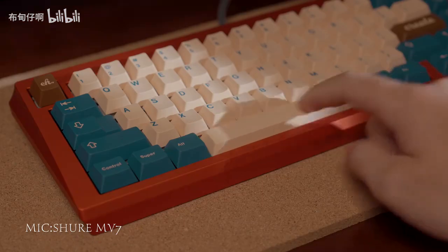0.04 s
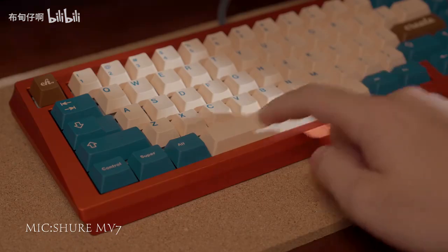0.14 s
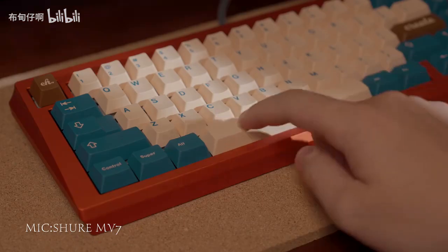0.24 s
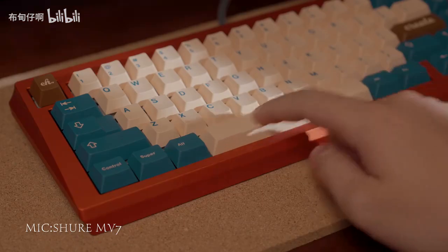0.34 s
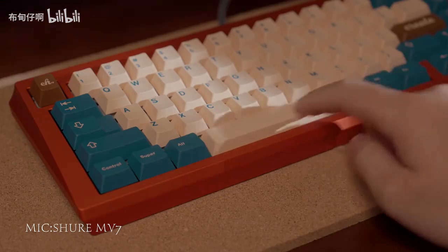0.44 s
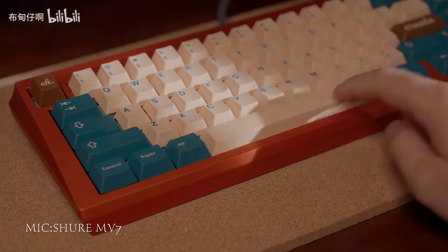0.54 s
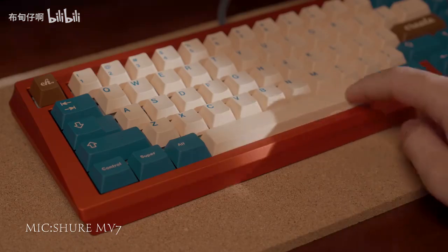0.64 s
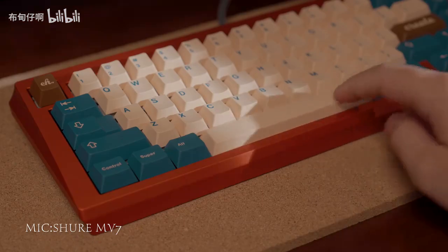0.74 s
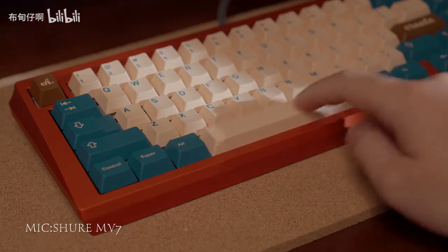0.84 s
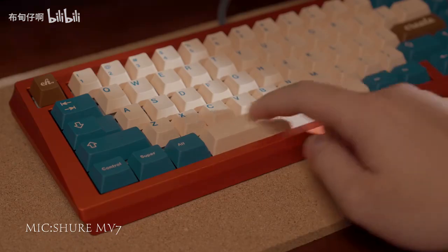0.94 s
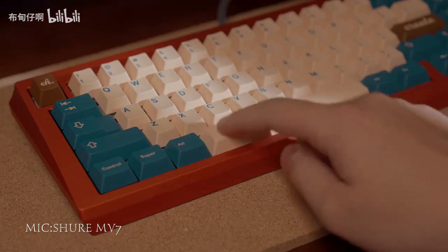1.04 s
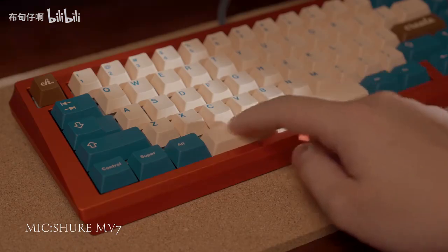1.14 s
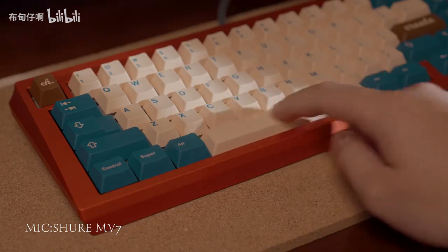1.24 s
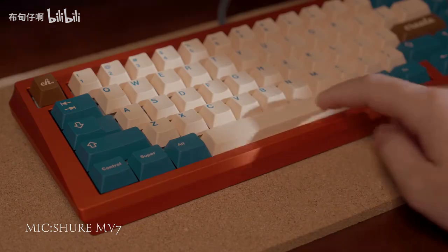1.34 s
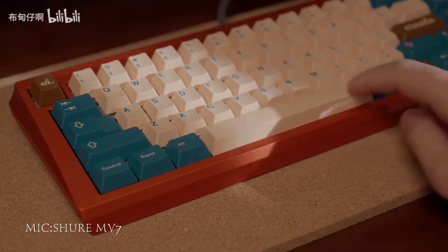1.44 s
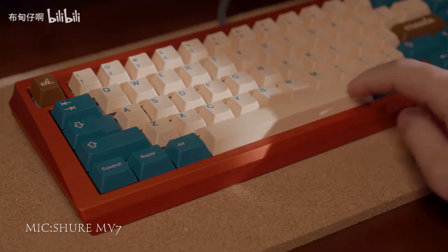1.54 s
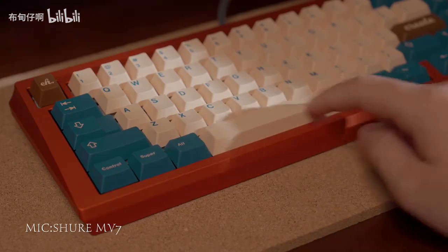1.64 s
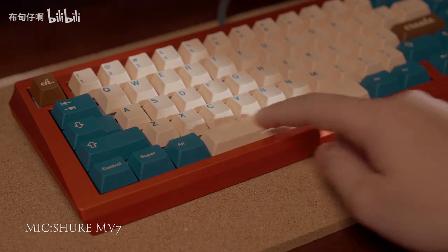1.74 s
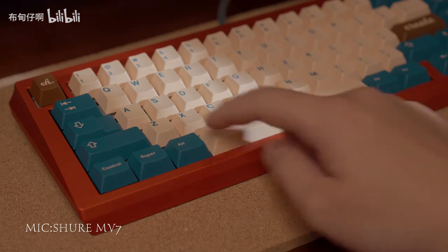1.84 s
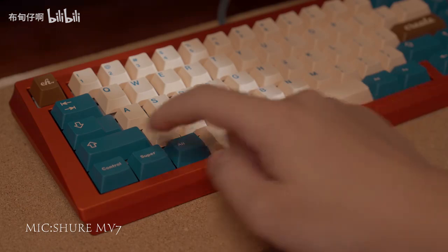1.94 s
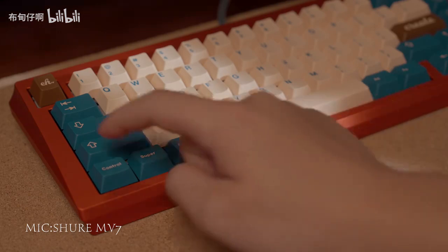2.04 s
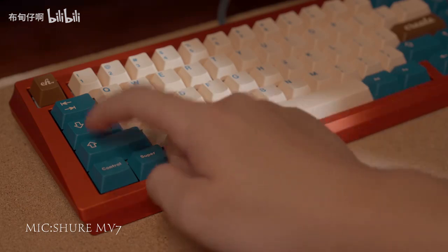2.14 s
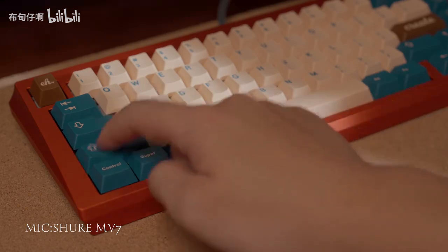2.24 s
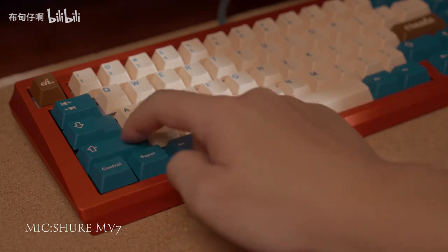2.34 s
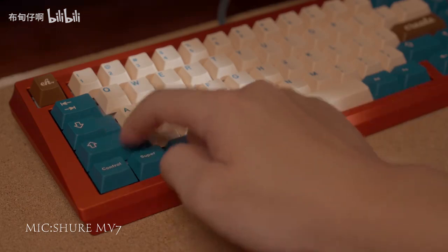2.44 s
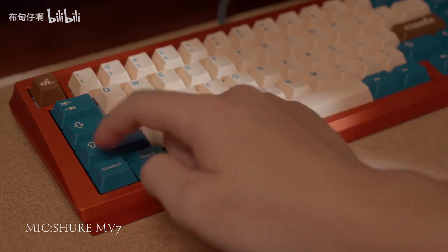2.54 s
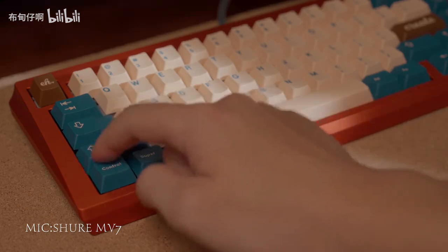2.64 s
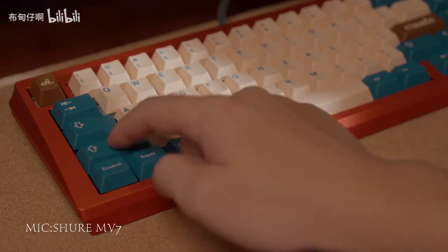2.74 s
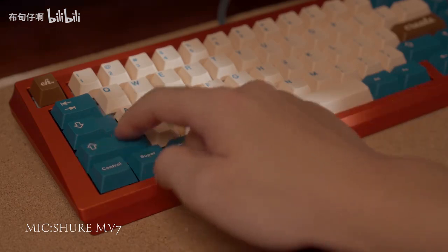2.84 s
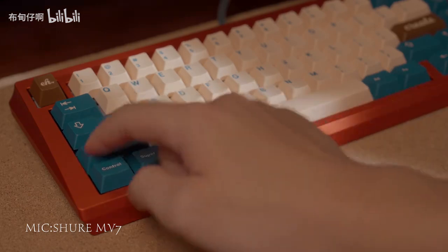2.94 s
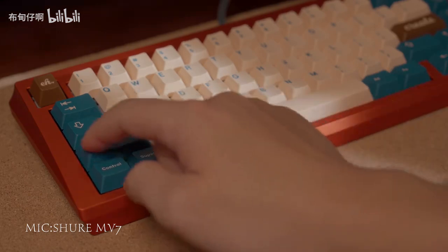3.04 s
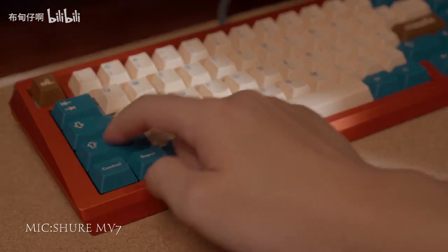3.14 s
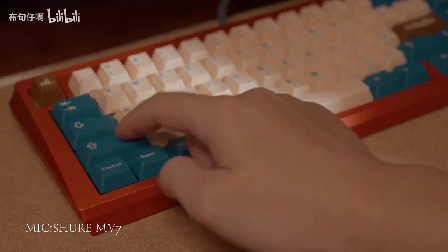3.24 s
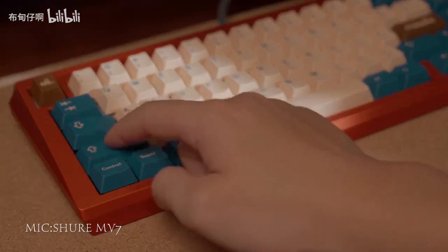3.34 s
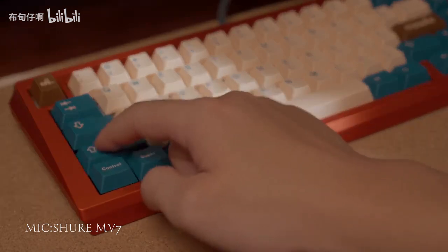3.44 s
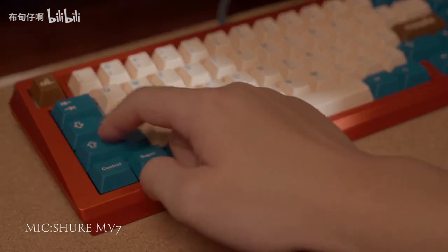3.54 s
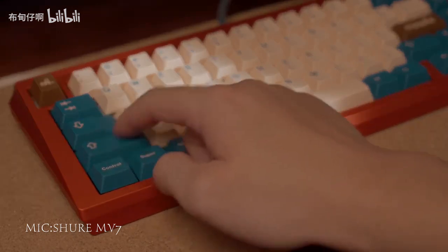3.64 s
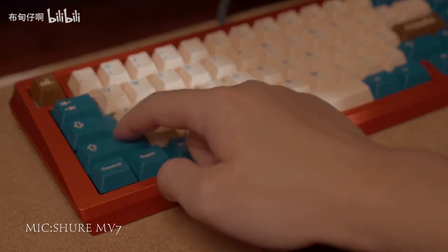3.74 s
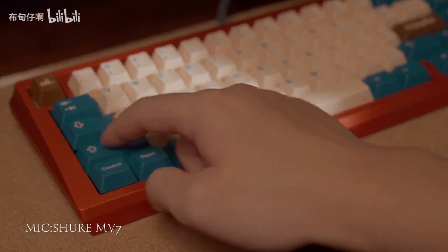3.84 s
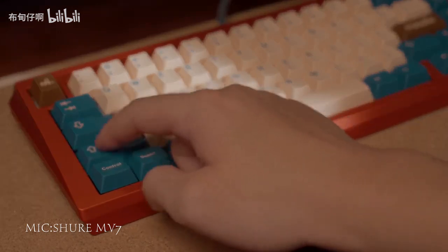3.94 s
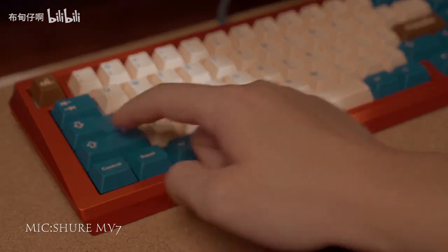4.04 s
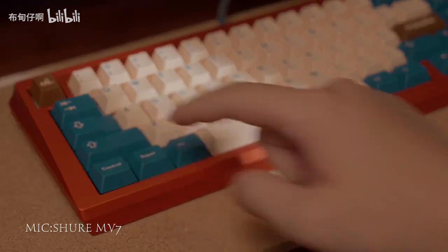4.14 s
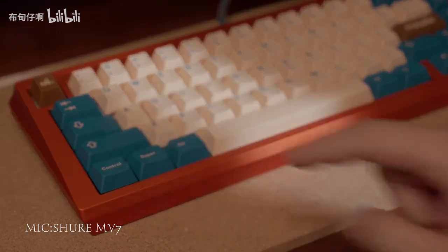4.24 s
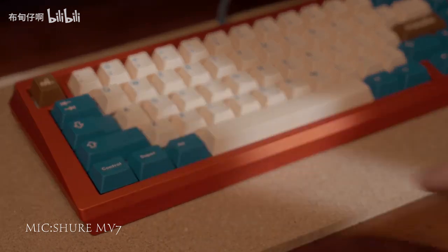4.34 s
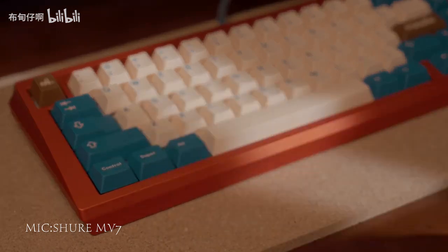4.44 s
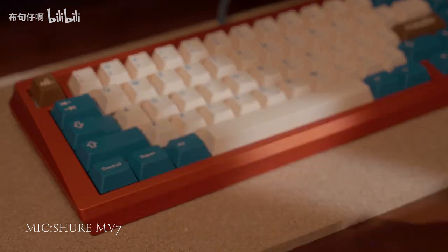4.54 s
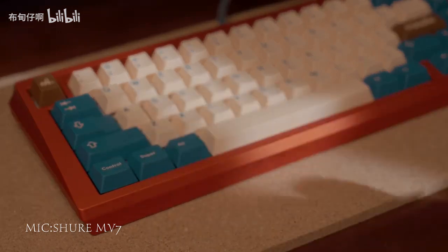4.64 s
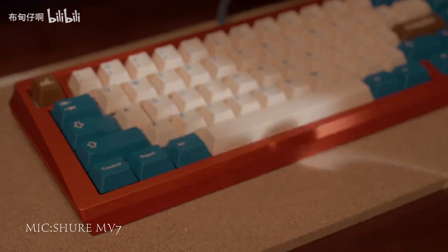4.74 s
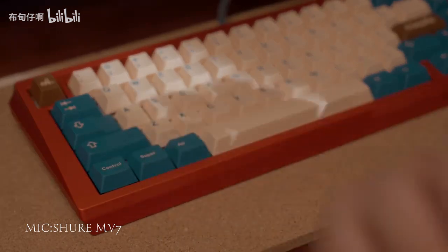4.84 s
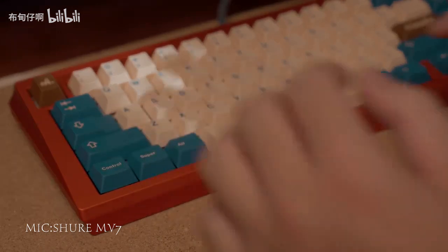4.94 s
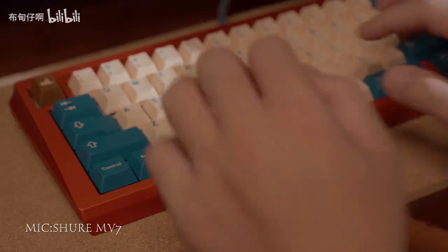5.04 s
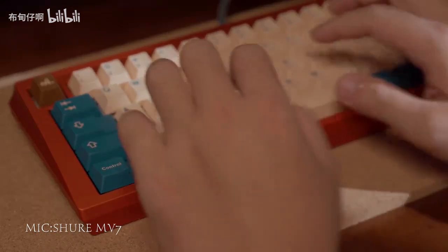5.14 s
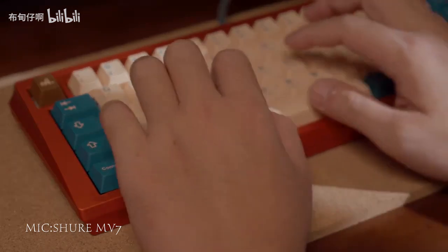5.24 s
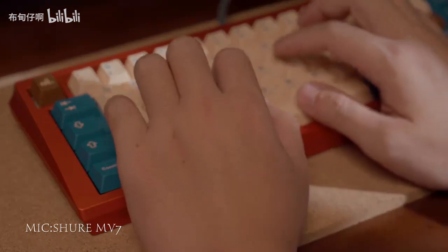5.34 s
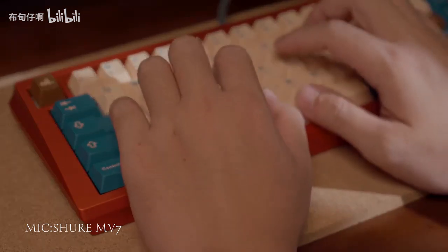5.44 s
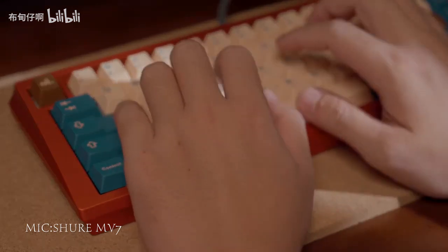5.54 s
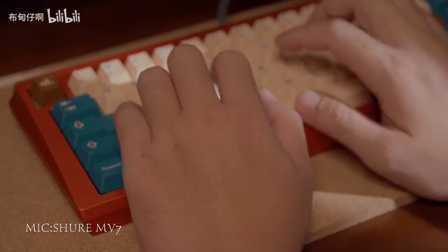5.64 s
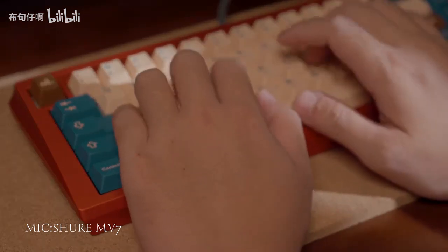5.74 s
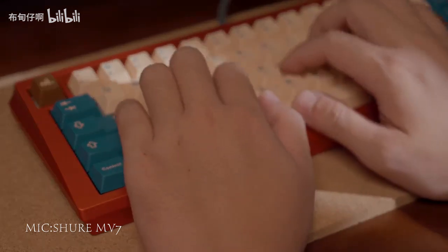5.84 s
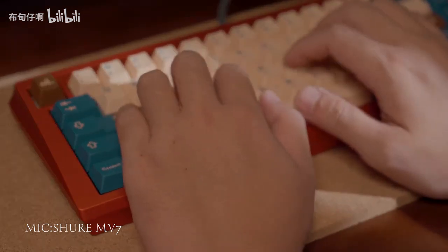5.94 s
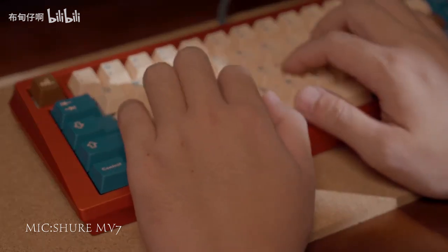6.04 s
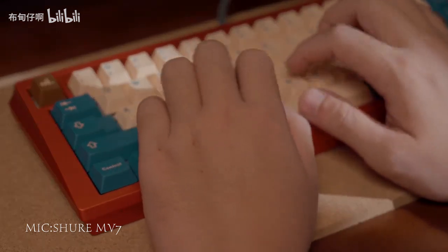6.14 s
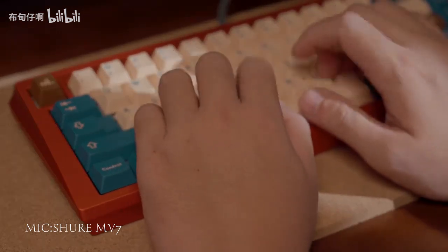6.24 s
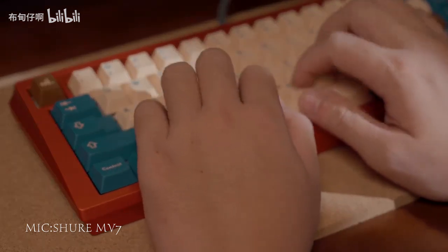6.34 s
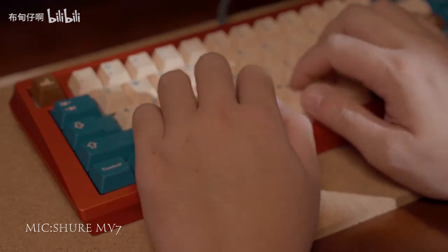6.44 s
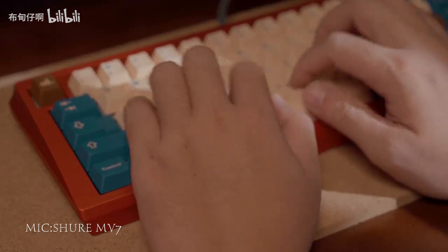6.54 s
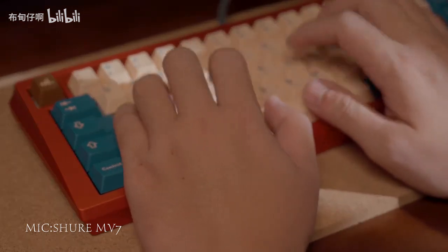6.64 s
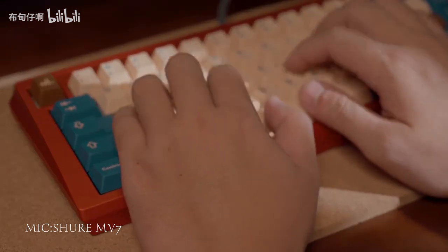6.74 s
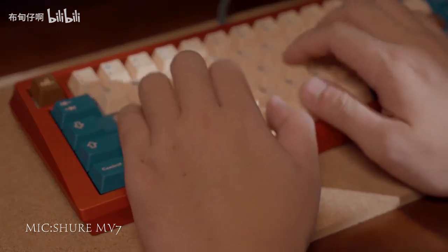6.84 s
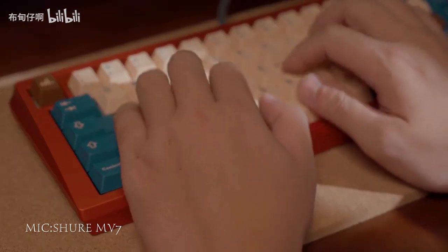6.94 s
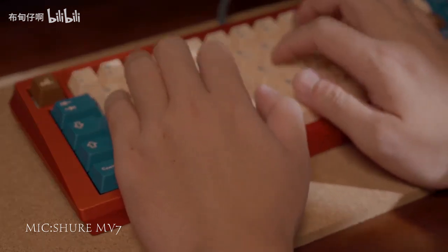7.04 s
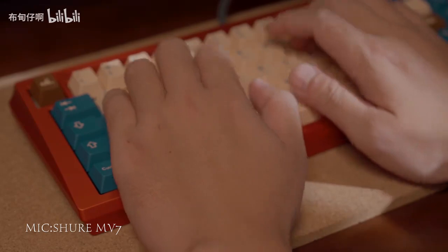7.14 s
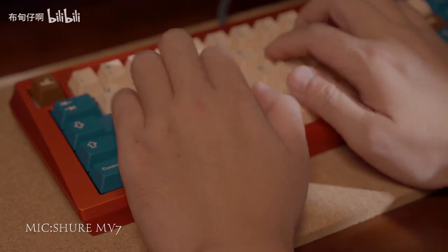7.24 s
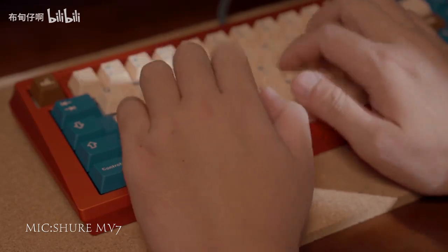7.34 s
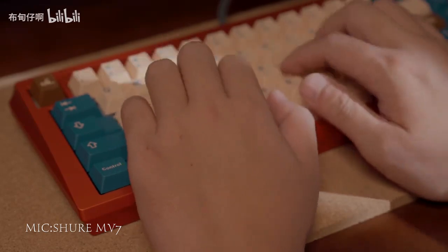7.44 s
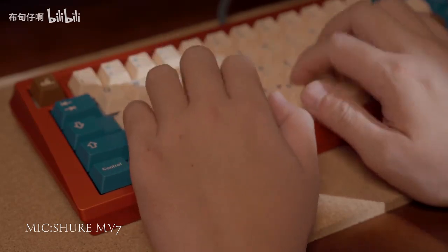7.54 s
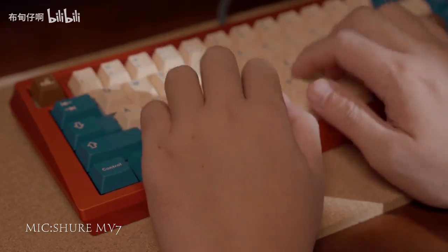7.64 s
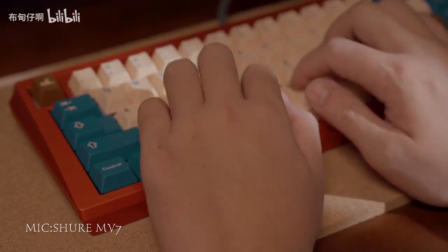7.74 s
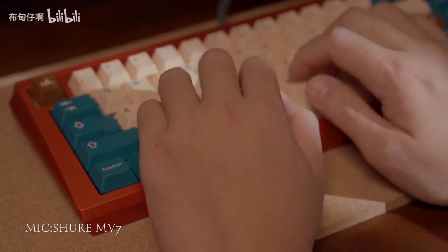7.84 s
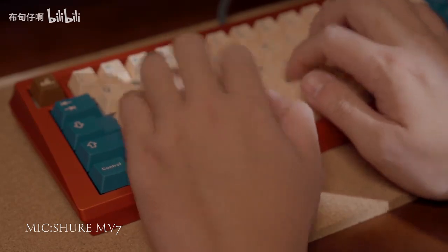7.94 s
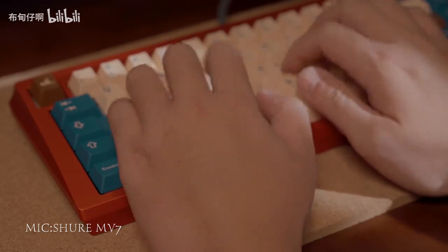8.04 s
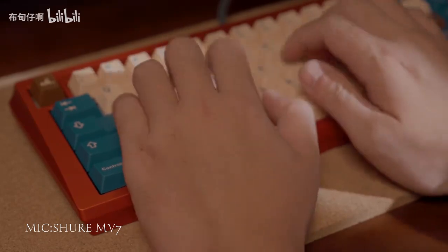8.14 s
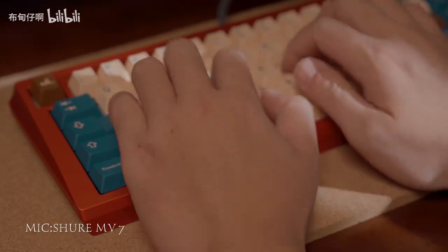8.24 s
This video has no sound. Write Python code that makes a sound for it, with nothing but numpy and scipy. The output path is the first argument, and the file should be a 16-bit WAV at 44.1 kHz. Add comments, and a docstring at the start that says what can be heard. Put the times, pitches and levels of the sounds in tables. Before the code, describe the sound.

Close, crisp mechanical keyboard clacks: steady hollow space bar hits, short dry snaps of another key, a quiet gap, then rapid irregular typing.

```python
"""A mechanical keyboard on a desk mat in a quiet room, heard from close by.
A finger drums on the space bar, then on a wide key at the left edge; after a pause both hands type fast.
Each clack is a burst of noise, coloured by a filter, with short ringing tones for plate and case.
Low noise thuds and a swaying low tone give the desk; fading noise gives the room's echo.
Soft noise makes the sliding hands and the room air, and a narrow strip of it a thin whine."""
import sys
import numpy as np
from scipy import signal
from scipy.fft import rfft, irfft
from scipy.io import wavfile

SR = 44100
rng = np.random.default_rng(int(sys.argv[2]) if len(sys.argv) > 2 else 0)


def wrap_up_sound(samples):
    """Save the sound to the file named by the first command line argument, as 16-bit audio."""
    columns = np.atleast_2d(samples).T
    # keep every value between -1 and 1, then stretch to whole-number steps
    tamed = np.clip(columns, -1, 1)
    steps = np.round(tamed * 32767).astype(np.int16)
    wavfile.write(sys.argv[1], SR, steps)


N = 365148
TOP_HZ = 16000   # upper end of the sound
CLACK_SIZE = 4096   # samples in one clack
AGE = np.arange(CLACK_SIZE) / SR   # seconds since the start of a clack
HZ = np.maximum(np.fft.rfftfreq(CLACK_SIZE, 1 / SR), 1)   # pitches at which a clack is coloured

# space bar hits bottom: (time [s], energy [dB], cap resonance [Hz])
SPACE_DOWN = [(0.0908, -2.5, 2290), (0.2219, -3.5, 1596), (0.3479, -3.5, 1570), (0.4664, -6, 1902),
              (0.5864, -8.5, 1485), (0.676, -2, 2050.0), (0.802, -3.5, 1280), (0.9314, -2.5, 1860.0),
              (1.0458, -0.5, 1570.0), (1.17, -0.6, 1390.0), (1.2967, -3.5, 1300.0), (1.4169, -2.5, 1810),
              (1.527, -0.4, 1446), (1.6473, -4, 1450.0), (1.763, -1.6, 1860), (1.9186, -4, 1538)]
# space bar springs back against its stop: (time [s], energy [dB])
SPACE_UP = [(0.0219, -3), (0.1551, -1.5), (0.2739, -0.1), (0.4021, -3), (0.5144, -2), (0.735, -4),
            (0.866, -2), (0.9761, -1), (1.0946, -0.4), (1.222, -0.5), (1.3491, -1.5), (1.4595, -0.5),
            (1.5961, -4), (1.7018, -4.5), (1.8365, -0.5)]
# wide key snaps down, then is let up gently: (time [s], energy [dB], time held [s], energy of return [dB])
WIDE_KEY = [(2.292, -3, .088, -25.5), (2.4443, -8.5, 0.084, -26.5), (2.587, -10, .058, -24.5),
            (2.72, -10, 0.064, -26), (2.8633, -10.5, .0625, -28.5), (3.0704, -9, 0.079, -25.5),
            (3.1953, -8.5, 0.067, -26.5), (3.313, -12.5, .0605, -26.5), (3.4187, -9, .082, -27),
            (3.5433, -10, .069, -22), (3.682, -8, .076, -39), (3.8018, -14, 0.066, -25.5),
            (3.91, -10.5, .065, -19.5), (4.0436, -12, .053, -22)]


def from_db(db):
    """Turn decibels into a gain."""
    return 10 ** (np.asarray(db) / 20)


def unit_energy(x):
    """Scale a sound so that its squares add up to one."""
    return x / np.sqrt(np.sum(x ** 2) + 1e-20)


def at_hz(points, hz):
    """Read a table between its points, with pitch spaced by octaves as the ear hears it."""
    points = np.array(points)
    return np.interp(np.log(hz), np.log(points[:, 0]), points[:, 1])


def band(x, low_hz, high_hz):
    """Gently keep the sound between two pitches."""
    edges = [low_hz, min(high_hz, SR * .45)]
    return signal.sosfilt(signal.butter(2, edges, "band", fs=SR, output="sos"), x)


def add(track, s, sound):
    """Mix a sound into a track at a time in seconds."""
    part = track[max(round(s * SR), 0):][:len(sound)]
    part += sound[:len(part)]


def dying_noise(t60, age=AGE):
    """Countless vibrations dying together, 60 dB down after t60 seconds; unit energy."""
    return unit_energy(rng.standard_normal(len(age)) * from_db(-60 * age / t60))


def causal_filter(level_db):
    """A filter with these levels (minimum phase), so that all its sound follows the blow."""
    cepstrum = irfft(np.log(from_db(level_db)))[:CLACK_SIZE // 2]
    cepstrum[0] /= 2
    return np.exp(rfft(2 * cepstrum, CLACK_SIZE))


def cap_resonance(cap_hz, height_db, octaves=0.23):
    """The hollow cap favours one pitch, set by the key and where the finger lands."""
    distance = np.log2(HZ / cap_hz) / octaves
    return height_db * np.exp(-.5 * distance ** 2)


def uneven(depth_db, count=48):
    """Every key and every touch has small peaks and dips of its own."""
    points = np.linspace(0, np.sqrt(SR / 2), count)
    return depth_db * np.interp(np.sqrt(HZ), points, rng.standard_normal(count))


def clack(colour_db, modes, spread_s, chatter_db, body_db, body_t60, vary_db=0.0):
    """One blow of unit energy: first contact, a moment of chatter, then the ring of plate and case."""
    chatter = from_db(chatter_db) * dying_noise(spread_s)
    body = from_db(body_db) * dying_noise(body_t60)
    force = chatter + body
    force[0] += 1   # first contact
    sound = unit_energy(irfft(rfft(force) * causal_filter(colour_db)))
    for hz, level_db, t60 in modes:
        mode_hz = hz * rng.normal(1, 0.0086)   # slightly off its usual pitch each time
        ring = unit_energy(np.sin(2 * np.pi * mode_hz * AGE) * from_db(-60 * AGE / t60))
        gain = from_db(level_db + rng.normal(0, vary_db))
        sound = sound + gain * ring * rng.choice([-1, 1])
    return unit_energy(sound)


def space_bar(lag_s=.0006, stabiliser_db=-1.5):
    """The switch lands just ahead of the stabilisers; the return is a single sharper snap."""
    # colour of the landing and of the return: (pitch [Hz], relative level [dB])
    down_colour = [(300, -35), (600, -31), (1000, -13), (1400, -1.5), (1900, 2), (2800, -13), (3500, -7.5),
                   (4600, -12), (5900, -25), (6600, -19.5), (7500, -35.5), (9600, -25.5), (13800, -41.5),
                   (16000, -55.5)]
    up_colour = at_hz([(300, -38), (500, -18.5), (950, -14.5), (1300, 1), (2000, 1.5), (3100, -8.5),
                       (3850, -10.5), (4250, 1), (4850, -8.5), (5900, -23.5), (6800, -18.5), (10000, -24.5),
                       (14000, -30), (16000, -47)], HZ)
    # tones that ring on: (pitch [Hz], energy relative to the clack [dB], time to fall 60 dB [s])
    modes = [(630, -27, .04), (1306, -26, .03), (1720, -21, .025), (3554, -15, 0.023), (4260, -21.5, 0.029),
             (4660, -22, 0.025)]
    out = np.zeros(N)
    for s, db, cap_hz in SPACE_DOWN:
        colour = at_hz(down_colour, HZ) + cap_resonance(cap_hz, height_db=5.0) + uneven(depth_db=1.1)
        landing = clack(colour, modes, spread_s=0.0099, chatter_db=-5.5, body_db=-12.5, body_t60=0.052)
        stabilisers = clack(colour, modes, spread_s=0.0023, chatter_db=1.0, body_db=0.5, body_t60=0.0072)
        this_lag_s = lag_s * rng.uniform(.5, 2.2)
        add(landing, this_lag_s, from_db(stabiliser_db) * stabilisers)
        add(out, s, from_db(db) * unit_energy(landing))
    for s, db in SPACE_UP:
        snap = clack(up_colour, modes, spread_s=0.0021, chatter_db=-2.0, body_db=-4.5, body_t60=0.023)
        add(out, s, from_db(db) * snap)
    return out


def wide_key(hardening=0.11):
    """Short dry snaps, brighter the harder the blow; faint ticks as the key comes up or a finger touches a cap."""
    # colour of the key: (pitch [Hz], relative level [dB])
    colour = at_hz([(300, -52.5), (650, -13), (1200, 0), (2000, 2.5), (3300, -0.5), (4000, -7.5),
                    (4400, -4), (5400, -8), (6200, -20.5), (7600, -13), (10000, -21), (13500, -35.5),
                    (16000, -34)], HZ)
    # tones that ring on: (pitch [Hz], energy relative to the clack [dB], time to fall 60 dB [s])
    modes = [(628, -21.5, 0.083), (1000, -25, .035), (1356, -24, 0.022), (4290, -28.5, 0.021),
             (5490, -20, .03)]
    # a finger meets a cap without pressing it: (time [s], energy [dB])
    touches = [(0.7198, -23), (1.6773, -23.5), (2.2849, -24), (2.704, -31), (3.022, -27)]
    out = np.zeros(N)
    usual_db = np.median(np.array(WIDE_KEY)[:, 1])
    for s, db, *_ in WIDE_KEY:
        tilt = hardening * (db - usual_db) * np.log2(HZ)   # hardening: dB per octave for each dB of blow
        snap = clack(colour + tilt, modes, spread_s=0.0024, chatter_db=-12.0, body_db=-11.0, body_t60=0.022)
        add(out, s, from_db(db) * snap)
    returns = [(s + held_s, return_db) for s, _, held_s, return_db in WIDE_KEY]
    for s, db in returns + touches:
        tick = clack(colour, modes, spread_s=0.0095, chatter_db=1.5, body_db=-2.0, body_t60=0.02)
        add(out, s, from_db(db) * tick)
    return out


def letter_contacts(tap_db=-4.5, tap_hz=1390, tap_octaves=0.18, graze_chance=.18, graze_within_s=.016,
                    graze_db=-17.5, graze_spread_db=3.5, graze_hz=1900, graze_octaves=0.41):
    """Taps on a cap followed by landings, single clacks, and now and then a graze of a neighbouring cap."""
    # key hits bottom: (time [s], energy [dB], cap resonance [Hz], travel time from tap to bottom [s])
    landings = [(5.803, -6, 2800, 0.0075), (5.9857, -8.5, 3820, 0.0051), (6.0208, -6.5, 2860, 0.0065),
                (6.1397, -7.5, 3150, 0.022), (6.4313, -6.5, 1130, 0.011), (6.4726, -7.5, 2380, .006),
                (6.5071, -8, 1900, 0.006), (6.544, -11, 3840, 0.019), (6.609, -9, 1840, 0.0056),
                (6.6679, -8.5, 1510, 0.0043), (6.769, -5, 2560, 0.013), (6.8514, -2.5, 3080, 0.0023),
                (6.8757, -8, 2960, 0.0096), (6.8953, -8.5, 3300, .012), (6.9404, -5.5, 2130, 0.0042),
                (6.969, -7.5, 3200, .013), (7.06, -12.5, 1210, .012), (7.1409, -8, 4140, 0.0057),
                (7.195, -7.5, 4480, 0.0043), (7.3128, -14, 1680, .012), (7.5428, -4.5, 3020, .01),
                (7.5588, -5, 4630, 0.0051), (7.6672, -7.5, 1070, 0.011), (7.7439, -5.5, 1070, 0.0071),
                (7.8357, -3.5, 1680, .0065), (7.917, -3, 2150, 0.0059), (7.9896, -3, 1460, .004),
                (8.0984, -4.5, 2400, 0.0022), (8.198, -5.5, 3020, 0.0062), (8.2421, -4, 2640, 0.0084)]
    # single clacks, a key landing or springing back: (time [s], energy [dB], cap resonance [Hz])
    single_clacks = [(5.814, -4, 3500), (5.8673, -12.5, 3610), (5.8955, -6, 3340), (5.9137, -10.5, 2800),
                     (5.9305, -7, 2740), (5.9498, -12.5, 3220), (6.002, -3, 2460), (6.0337, -11, 3540),
                     (6.065, -6.5, 3350), (6.17, -17.5, 2400), (6.2076, -17.5, 1490), (6.3002, -11, 2750),
                     (6.313, -7.5, 1660), (6.336, -13.5, 1440), (6.374, -8.5, 4070), (6.392, -4.5, 4280),
                     (6.4463, -14, 1830), (6.516, -15, 1940), (6.5257, -14.5, 1100), (6.6266, -12, 1780),
                     (6.7876, -8, 3630), (6.8085, -13.5, 3600), (6.9961, -4.5, 2830), (7.0032, -5.5, 3000),
                     (7.038, -16, 1280), (7.0795, -11.5, 1210), (7.2053, -10.5, 4280), (7.2155, -18, 2400),
                     (7.2657, -3.5, 3930), (7.277, -2.5, 3220), (7.292, -11.5, 1780), (7.3374, -7, 3740),
                     (7.3821, -11.5, 3740), (7.3984, -17, 2400), (7.437, -13, 4160), (7.4567, -5, 3500),
                     (7.4715, -14.5, 3770), (7.5136, -13, 2500), (7.5982, -13, 3410), (7.642, -9, 2500),
                     (7.6562, -13.5, 2170), (7.674, -12, 2320), (7.6937, -19, 1100), (7.7818, -17.5, 2350),
                     (7.8186, -8, 1940), (7.8728, -5.5, 1780), (7.9647, -8, 4200), (7.9985, -4.5, 1950),
                     (8.034, -8, 1900), (8.0486, -8.5, 1100), (8.0882, -6, 2620), (8.1243, -17, 1230),
                     (8.1479, -3, 3400), (8.1545, -3.5, 2860), (8.22, -13.5, 1330), (8.2656, -5, 2400)]
    contacts = []
    for s, db, _, travel_s in landings:
        # the tap is softer than the landing, and hollow
        contacts.append((s - travel_s, db + tap_db, tap_hz * 2 ** rng.normal(0, tap_octaves)))
    strokes = [row[:3] for row in landings] + single_clacks
    contacts += strokes
    for s, *_ in strokes:
        if rng.random() < graze_chance:
            graze_s = s + graze_within_s * rng.uniform(.3, 1)
            cap_hz = graze_hz * 2 ** rng.normal(0, graze_octaves)
            contacts.append((graze_s, rng.normal(graze_db, graze_spread_db), cap_hz))
    return contacts


def letters(contacts, hard_hz=5800, treble_db=3.5, treble_per_db=0.4, usual_db=-8.0, treble_spread_db=1,
            rattle_db=-25.0, rub_db=-25.0, rattle_spread_db=8.5, after_s=0.019, travel_s=0.0065):
    """Small caps clack brightly; each stem rubs along its guide before the blow and wobbles after it."""
    # colour of a letter key: (pitch [Hz], relative level [dB])
    letter_colour = at_hz([(300, -34), (600, -20), (900, -4), (1600, -3.5), (2200, 2), (3100, 2),
                           (4100, -10), (5500, -7.5), (6100, -16), (7000, -12), (7900, -15.5),
                           (11000, -12.5), (14000, -35), (16000, -94)], HZ)
    # tone that rings on: (pitch [Hz], energy relative to the clack [dB], time to fall 60 dB [s])
    modes = [(10520, -19.5, 0.0063)]
    out = np.zeros(N)
    treble = 1 / (1 + (hard_hz / HZ) ** 8)   # rises from 0 to 1 around hard_hz
    for s, db, cap_hz in contacts:
        # a harder blow is brighter, and no two touches are equally crisp
        hard_db = treble_db + treble_per_db * (db - usual_db) + rng.normal(0, treble_spread_db)
        colour = letter_colour + cap_resonance(cap_hz, height_db=6.5) + hard_db * treble
        colour = colour + uneven(depth_db=2.0)
        blow = clack(colour, modes, spread_s=0.0028, chatter_db=-0.5, body_db=-3.0, body_t60=0.019)
        add(out, s, from_db(db) * blow)

        wobble = clack(colour, [], spread_s=0.0051, chatter_db=18.0, body_db=-11.0, body_t60=0.021)
        wobble_db = db + rattle_db + rng.normal(0, rattle_spread_db)
        add(out, s + after_s * rng.uniform(0.27, 1), from_db(wobble_db) * wobble)

        travel = travel_s * rng.uniform(0.32, 2.5)
        friction = rng.standard_normal(CLACK_SIZE) * AGE * (AGE < travel)   # grows with the speed of the stem
        rub = unit_energy(irfft(rfft(friction) * causal_filter(colour)))
        this_rub_db = db + rub_db + rng.normal(0, rattle_spread_db)
        add(out, s - travel, from_db(this_rub_db) * rub)
    return out


def desk_thuds(events, level_db, low_hz, high_hz, t60):
    """A little of each blow passes through the mat into the desk top."""
    out, age = np.zeros(N), np.arange(SR // 3) / SR
    for s, db, *_ in events:
        add(out, s, from_db(db + level_db) * dying_noise(t60, age))
    # make up for the energy lost by keeping only a narrow band
    return band(out, low_hz, high_hz) * np.sqrt(SR / 2 / (high_hz - low_hz))


def desk_sway(desk_hz=39, waver_hz=1.3, count=50):
    """The lowest vibration of the desk, its pitch wavering slowly at random."""
    # how far the desk sways: (time [s], level [dB])
    sway = [(0.0, -57), (1.06, -51.5), (1.54, -58.5), (1.78, -50), (2.24, -63.5), (2.79, -54.5),
            (2.86, -62), (4.22, -51), (4.93, -83.5), (5.76, -70.5), (5.86, -57), (6.71, -58.5), (6.73, -63),
            (6.97, -46.5), (7.19, -66.5), (7.47, -46.5), (8.02, -60.5), (8.28, -46)]
    t = np.arange(N) / SR
    waver = np.interp(t, np.linspace(0, t[-1], count), rng.standard_normal(count))
    hz = desk_hz + waver_hz * waver
    strength = from_db(np.interp(t, *np.transpose(sway)))
    return np.sqrt(2) * strength * np.sin(2 * np.pi * np.cumsum(hz) / SR)


def hand_slide(low_hz=1100, high_hz=3300, ring_db=-3.5, width_hz=280,
               rumble_db=12.5, rumble_low_hz=65, rumble_high_hz=105):
    """Rubbing skin: soft hiss, one resonance and a desk rumble, swelling and fading with the hand's speed."""
    # a hand slides over mat or caps: (time at the fastest [s], half length [s], hiss level [dB],
    # favoured pitch [Hz])
    slides = [(4.421, 0.25, -81.5, 1504), (4.979, .14, -84.5, 3240), (5.53, 0.092, -88.5, 2216)]
    out, t = np.zeros(N), np.arange(N) / SR
    for s, half_s, db, hz in slides:
        friction = rng.standard_normal(N)
        hiss = unit_energy(band(friction, low_hz, high_hz))
        ring = from_db(ring_db) * unit_energy(band(friction, hz - width_hz / 2, hz + width_hz / 2))
        rumble = from_db(rumble_db) * unit_energy(band(friction, rumble_low_hz, rumble_high_hz))
        speed = np.exp(-((t - s) / half_s) ** 2)
        out += from_db(db) * speed * np.sqrt(N) * (hiss + ring + rumble)
    return out


def stray_ticks(blows, level_db=-15.5, low_hz=1200, high_hz=13500):
    """Each blow also throws a plain broad tick upwards, heard only by way of the room."""
    out = np.zeros(N)
    for s, db, *_ in blows:
        add(out, s, [from_db(db + level_db)])
    return band(out + 1e-18, low_hz, high_hz)


def room(x, build_s=.006):
    """A diffuse tail that builds up within a few milliseconds; each band dies at its own pace."""
    # bands of the tail: (centre [Hz], time to fall 60 dB [s], relative level [dB])
    bands = [(250, .45, -5), (700, 0.57, 12), (1590, 0.9, -1), (2980, 0.6, 1), (4600, 0.59, 2.5),
             (7550, 0.88, 2), (13000, 0.27, 5.5)]
    age = np.arange(SR * 2 // 3) / SR
    centres = np.array(bands)[:, 0]
    edges = np.r_[centres[0] / 2, np.sqrt(centres[1:] * centres[:-1]), TOP_HZ]
    tail = np.zeros(len(age))
    for (_, t60, db), low_hz, high_hz in zip(bands, edges, edges[1:]):
        noise = band(rng.standard_normal(len(age)), low_hz, high_hz)
        tail += noise * from_db(db - 60 * age / t60)
    build_up = 1 - np.exp(-age / build_s)
    return signal.fftconvolve(x, unit_energy(tail * build_up))[:N]


def air(level_db=-67):
    """Steady, dull background noise of the room."""
    # colour of the air: (pitch [Hz], relative level in each Hz [dB])
    colour = [(30, 1.5), (45, -2), (90, -3), (240, -8.5), (400, -13.5), (800, -21), (1600, -25.5),
              (3000, -41), (7000, -45.5), (14000, -47.5), (16000, -51)]
    hz = np.maximum(np.fft.rfftfreq(N, 1 / SR), 1)
    noise = irfft(rfft(rng.standard_normal(N)) * from_db(at_hz(colour, hz)), N)
    return from_db(level_db) * np.sqrt(N) * unit_energy(noise)


def whine(centre_hz=5400, width_hz=200, level_db=-96.0):
    """A thin, barely audible tone in the background, made of a narrow strip of noise."""
    noise = band(rng.standard_normal(N), centre_hz - width_hz / 2, centre_hz + width_hz / 2)
    return from_db(level_db) * np.sqrt(N) * unit_energy(noise)


def scene():
    """Keys, desk and room at one close microphone."""
    # the hand lands on the wide key and thumps the desk: (time [s], energy [dB])
    hand_thump = [(2.2923, -19)]
    contacts = letter_contacts()
    keys = space_bar() + wide_key() + letters(contacts)
    # the first wide-key blow has the hand's thump instead of a plain thud
    thuds = (desk_thuds(SPACE_DOWN, level_db=-27.5, low_hz=42, high_hz=65, t60=.35)
             + desk_thuds(WIDE_KEY[1:], level_db=-13.0, low_hz=43, high_hz=68, t60=0.56)
             + desk_thuds(contacts, level_db=-24.5, low_hz=42.0, high_hz=83.3, t60=0.34)
             + desk_thuds(contacts, level_db=-32.0, low_hz=110, high_hz=281, t60=0.22)
             + desk_thuds(hand_thump, level_db=-3.0, low_hz=75, high_hz=169.0, t60=0.21))
    ticks = stray_ticks(SPACE_DOWN + SPACE_UP + WIDE_KEY + contacts)
    tail = from_db(-22.0) * room(keys + ticks)
    background = hand_slide() + air() + whine()
    return (keys + thuds + desk_sway() + tail + background)[None]


def record(dry):
    """A steep filter cuts the top, 60 dB down from TOP_HZ upwards."""
    return signal.sosfilt(signal.cheby2(14, 60, TOP_HZ, fs=SR, output="sos"), dry)


dry = scene()
out = record(dry)
wrap_up_sound(out)
```